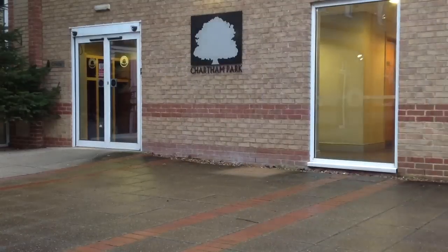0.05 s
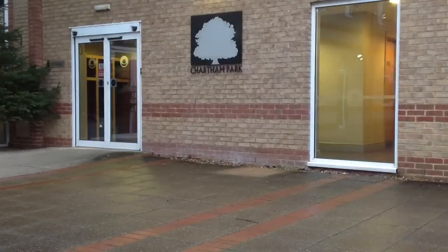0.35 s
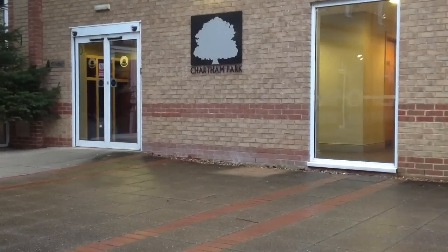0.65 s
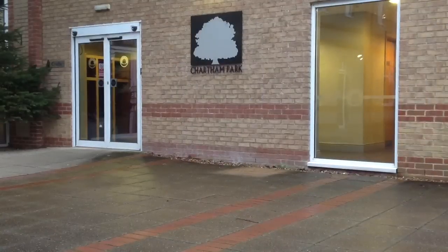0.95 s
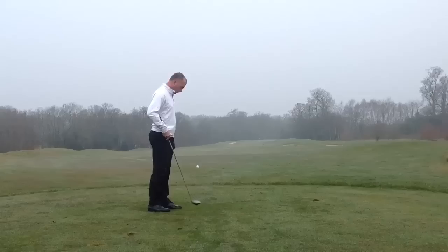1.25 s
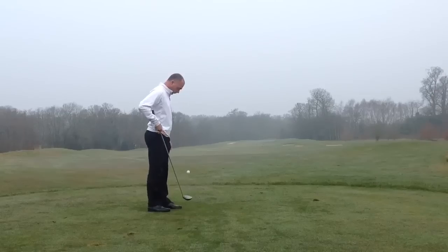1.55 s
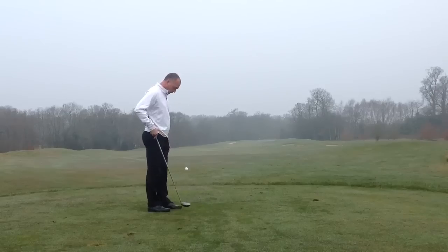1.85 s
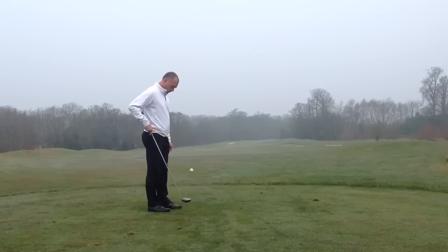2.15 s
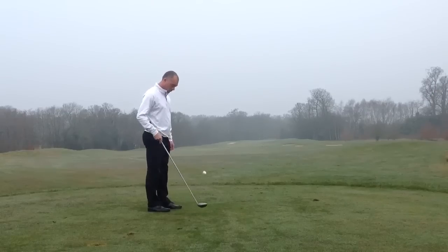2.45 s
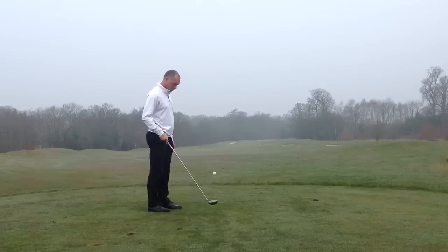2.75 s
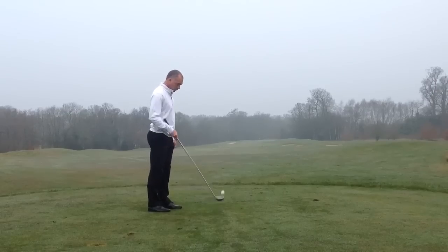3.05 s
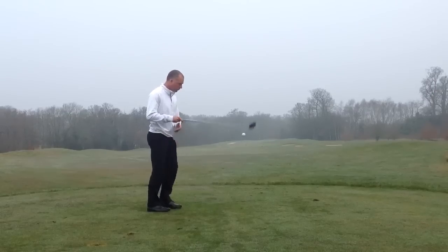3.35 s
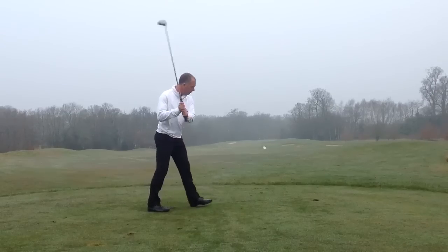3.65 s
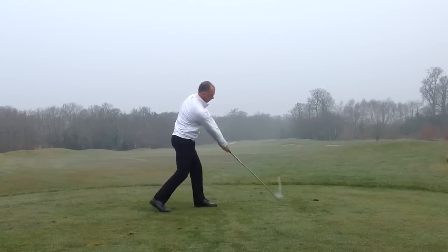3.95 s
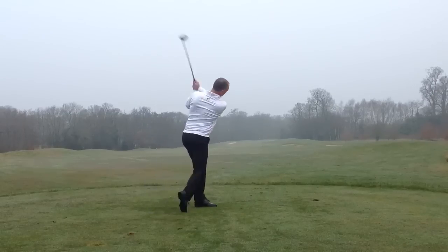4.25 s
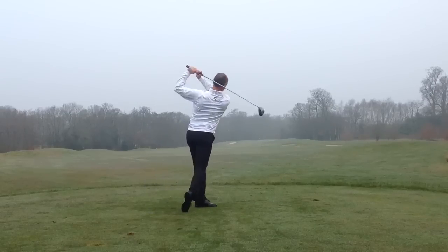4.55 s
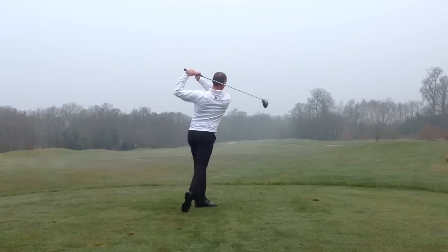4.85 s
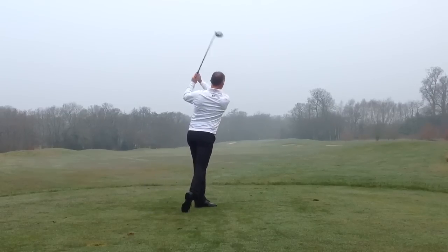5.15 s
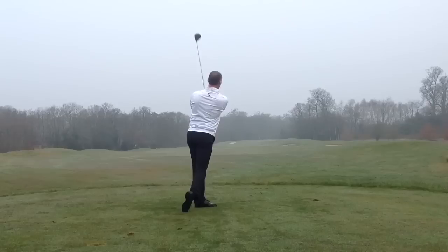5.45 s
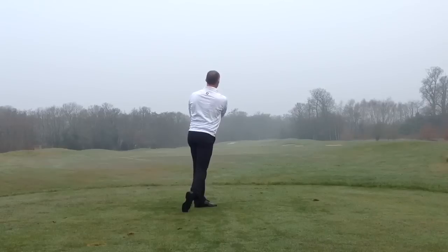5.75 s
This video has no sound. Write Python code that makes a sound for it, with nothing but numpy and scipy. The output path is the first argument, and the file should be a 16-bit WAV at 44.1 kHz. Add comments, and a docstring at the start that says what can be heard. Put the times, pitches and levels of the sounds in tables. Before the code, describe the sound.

Four evenly spaced clicks of a golf ball on a club, then a swish and a loud metallic crack on a quiet course.

```python
"""Golf ball juggled and driven

A building's forecourt hums, then the scene cuts to an open golf course with far birds.
A golfer bounces a ball four times on his driver's face, steps in and hits it out of the air.
The hollow metal head rings; as it flies away the Doppler effect flattens the ring, which
glides back up as the head slows. The turf and a line of trees answer faintly."""
import sys
import numpy as np
from scipy import signal
from scipy.fft import rfft, irfft, next_fast_len
from scipy.io import wavfile
from scipy.ndimage import map_coordinates

SR = 44100
rng = np.random.default_rng(int(sys.argv[2]) if len(sys.argv) > 2 else 0)


def dump_mix(stems):
    """Bounce the given channels to the path in sys.argv[1] as a 16-bit WAV at rate SR."""
    frames = np.atleast_2d(stems).T  # one column per channel
    limited = np.clip(frames, -1, 1)  # hard clip at full scale
    pcm = np.round(limited * 32767).astype(np.int16)
    wavfile.write(sys.argv[1], SR, pcm)


N = 255339
TOP_HZ, SOUND_SPEED_M_S = 15350, 343


def amp(db):
    """Decibels to gain."""
    return 10 ** (np.asarray(db) / 20)


def unit(x):
    """Scale to rms 1."""
    return x / np.sqrt(np.mean(x ** 2) + 1e-20)


def along(points, hz):
    """Read (freq_hz, value) rows on a log axis."""
    freq_hz, values = np.transpose(points)
    return np.interp(np.log(hz + 1), np.log(freq_hz + 1), values)


def curve(rows):
    """One value per sample from (time_s, value) rows."""
    return np.interp(np.arange(N) / SR, *np.transpose(rows))


def wobble(rate_hz):
    """Smooth random curve."""
    knots = rng.standard_normal(int(N * rate_hz / SR) + 4)
    return map_coordinates(knots, [np.arange(N) * rate_hz / SR])


def filtered(x, response):
    """Apply a gain that depends on frequency."""
    size = next_fast_len(len(x) + SR // 4)
    return irfft(rfft(x, size) * response(np.fft.rfftfreq(size, 1 / SR)), size)[:len(x)]


def butter(x, edge_hz, kind):
    """Butterworth filter, 12 dB per octave."""
    return signal.lfilter(*signal.butter(2, edge_hz, kind, fs=SR), x)


def noise(spectrum):
    """Shaped noise of rms 1."""
    return unit(filtered(rng.standard_normal(N), lambda hz: amp(along(spectrum, hz))))


def add(track, start_s, sound):
    """Mix a sound into the track."""
    part = track[round(start_s * SR):][:len(sound)]
    part += sound[:len(part)]


# freq_hz, density_db
FORECOURT_SPECTRUM = [(25, -44), (50, -34), (90, -16.5), (180, -5.5), (320, -0.5), (450, -6), (640, -6),
                      (950, -10), (1380, -6.5), (1900, -16), (2850, -26), (4700, -30), (7000, -34.5),
                      (15000, -39)]
COURSE_SPECTRUM = [(25, -42.5), (45, -36.5), (75, -13), (130, -0.5), (190, -0.5), (330, -4), (470, -12.5),
                   (750, -11), (980, -8.5), (1500, -16), (2300, -22), (3200, -26), (6000, -30.5),
                   (15000, -35.5)]
RUMBLE_SPECTRUM = [(90, -51), (190, -16), (280, 3), (390, 2.5), (520, -13), (900, -35), (2000, -69)]
# time_s, level_db
RUMBLE_LEVEL = [(1.27, -70.5), (1.58, -56.5), (1.78, -69), (2.28, -56), (2.46, -58.5), (2.7, -53),
                (3.2, -64.5), (3.7, -64), (3.85, -59.5), (4.2, -64.0), (4.98, -64.5), (5.08, -58.5),
                (5.45, -57.5), (5.6, -63.5), (5.75, -54.0)]


def air(cut_s=1.265, fade_s=0.0075):
    """Steady forecourt hum, then the quieter course with swells of low rumble."""
    forecourt = amp(-52 + 0.66 * wobble(7.55)) * noise(FORECOURT_SPECTRUM)
    course = amp(-57 + 0.45 * wobble(4.6)) * noise(COURSE_SPECTRUM)
    rumble = amp(curve(RUMBLE_LEVEL) + 1.6 * wobble(20)) * noise(RUMBLE_SPECTRUM)
    on_course = np.clip((np.arange(N) / SR - cut_s) / fade_s + 0.5, 0, 1)
    return (1 - on_course) * forecourt + on_course * (course + rumble)


# start_s, level_db
TICKS = [(.0802, -42.5), (.549, -43)]


def ticks(band_hz=(1000, 3500), t60_s=0.013):
    """Faint dry ticks on the forecourt."""
    out, t = np.zeros(N), np.arange(SR // 20) / SR
    for start_s, level_db in TICKS:
        add(out, start_s, amp(level_db - 60 * t / t60_s) * rng.standard_normal(len(t)))
    return butter(out, band_hz, 'band')


# freq_hz, t60_s
TURF_DECAY = [(300, 0.31), (2000, .3), (6000, .3), (9000, 0.23), (14000, 0.11)]
TREE_DECAY = [(300, 0.78), (2000, 0.74), (4200, .6), (5200, 1.1), (6000, 0.59), (7500, 0.5), (14000, .1)]


def scatter(x, decay, delay_s, rise_s):
    """Diffuse outdoor echo: builds after a delay, each frequency dying at its own rate."""
    hz, t, bins = signal.stft(rng.standard_normal(SR), SR, nperseg=256)
    tail = signal.istft(bins * amp(-60 * t / along(decay, hz)[:, None]), SR, nperseg=256)[1]
    tail *= np.clip((np.arange(len(tail)) / SR - delay_s) / rise_s, 0, 1)
    return signal.fftconvolve(x, tail / np.linalg.norm(tail))[:N]


def bird_note(length_s, bend_hz):
    """Pure tone bending through three pitches."""
    progress = np.linspace(0, 1, int(length_s * SR))
    pitch_hz = np.polyval(np.polyfit([0, 0.5, 1], bend_hz, 2), progress)
    envelope = np.sqrt(np.abs(np.sin(np.pi * progress)))
    return envelope * np.sin(2 * np.pi * np.cumsum(pitch_hz) / SR)


# time_s, level_db
FLOCK_LEVEL = [(0, -81), (1.7, -80), (2.3, -74.5), (4.3, -76.5), (5.25, -85)]


def flock(centre_hz=3350, pitch_spread=0.21, bend_spread=0.1, flutter_db=3, count=450):
    """Far birds overlap in short twitters, each with its own pitch and bend."""
    out = np.zeros(N)
    for when, length, *draws in rng.random((count, 6)):
        pitch, *bend = 2 * np.array(draws) - 1
        bend_hz = centre_hz * np.exp(pitch_spread * pitch + bend_spread * np.array(bend))
        add(out, when * N / SR, bird_note(0.022 + 0.04 * length, bend_hz))
    return amp(curve(FLOCK_LEVEL)) * unit(out * amp(flutter_db * wobble(120)))


def trill(start_s=5.37, attack_s=0.16, centre_hz=3350, level_db=-71.5, waver=0.038, flutter_db=3):
    """One bird holds a note that wavers fast in pitch and strength."""
    pitch_hz = centre_hz * np.exp(waver * wobble(130))
    note = np.sin(2 * np.pi * np.cumsum(pitch_hz) / SR) * amp(flutter_db * wobble(60))
    swell = np.clip((np.arange(N) / SR - start_s) / attack_s, 0, 1)
    return amp(level_db) * swell * unit(note)


# length_s, start_pitch_ratio, end_pitch_ratio
UPSLUR_SHAPE = (0.057, .74, 1.12)
ARCH_SHAPE = (.072, .88, 1.0)
DOWNSLUR_SHAPE = (0.066, 1.13, 0.94)
WHISTLE_SHAPE = (0.122, 0.99, 0.96)
CHIRP_SHAPE = (0.056, 1.2, .94)
CHIP_SHAPE = (.028, 1.24, 0.78)
# start_s, mid_pitch_hz, relative_db
UPSLURS = [(1.22, 4190, -68), (1.462, 4500, -67), (1.855, 4780, -64)]
ARCHES = [(.82, 4550, -67), (1.06, 4950, -67.5), (1.772, 5000, -64.5), (1.94, 5100, -71),
          (2.835, 3710, -66)]
DOWNSLURS = [(1.278, 4670, -64), (1.66, 4780, -61.5), (1.755, 6050, -72), (2.045, 4940, -65.5),
             (2.806, 2920, -65.5)]
WHISTLES = [(1.514, 2780, -66), (1.77, 2830, -65), (1.79, 3450, -72), (2.221, 2670, -67),
            (2.472, 2770, -61.5), (2.915, 2714, -65.5), (3.18, 2760, -62.5), (4.108, 4330, -69)]
CHIRPS = [(2.065, 3150, -63), (2.135, 3000, -65), (2.715, 3250, -69), (3.638, 2950, -65),
          (3.773, 3000, -63), (4.056, 2940, -61), (4.192, 2975, -62)]
CHIPS = [(4.478, 3700, -70), (4.549, 3900, -62.5), (4.635, 3950, -62.5)]


def birds(gain_db=-1.8, flutter_db=3):
    """A few birds repeat six kinds of note, higher or lower."""
    song = np.zeros(N)
    kinds = [(UPSLUR_SHAPE, UPSLURS), (ARCH_SHAPE, ARCHES), (DOWNSLUR_SHAPE, DOWNSLURS),
             (WHISTLE_SHAPE, WHISTLES), (CHIRP_SHAPE, CHIRPS), (CHIP_SHAPE, CHIPS)]
    for (length_s, start_ratio, end_ratio), notes in kinds:
        for start_s, mid_hz, relative_db in notes:
            note = bird_note(length_s, [start_ratio * mid_hz, mid_hz, end_ratio * mid_hz])
            add(song, start_s, amp(relative_db + gain_db) * note)
    return song * amp(flutter_db * wobble(70))


# start_s, level_db
STEPS = [(3.529, -43), (3.869, -44)]


def footsteps(thud_hz=310, rise_s=0.0039):
    """Two soft footfalls on turf."""
    out, t = np.zeros(N), np.arange(SR // 8) / SR
    envelope = 2 * (t / rise_s) ** 2 * np.exp(-t / rise_s)
    for start_s, level_db in STEPS:
        add(out, start_s, amp(level_db) * envelope * np.sin(2 * np.pi * thud_hz * t))
    return out


# freq_hz, density_db
SWISH_SPECTRUM = [(60, -57.5), (200, -24), (450, -3.5), (700, 0), (1400, -5.5), (3000, -20), (5000, -32),
                  (10000, -50.5)]


def swish(peak_s=3.922, peak_db=-48.5, rise_db_per_s=362, fall_db_per_s=140):
    """Air torn by the club, loudest where the head is fastest, just before the blow."""
    after_s = np.arange(N) / SR - peak_s
    level_db = peak_db + np.minimum(rise_db_per_s * after_s, -fall_db_per_s * after_s)
    return amp(level_db) * noise(SWISH_SPECTRUM)


# freq_hz, bounce_db, full_blow_db, base_t60_s
KNOCK_MODES = [(450, -18, -16, 0.012), (666, -15, -14, .015), (850, -14.5, -9.5, 0.013),
               (1125, -10.5, -17.5, 0.013), (1375, -5.5, -11, 0.012), (1540, -14.5, -32, .008),
               (1717, -5.5, -12, 0.014), (1884, -27, -5.5, 0.012), (2560, -19, -11.5, 0.0095),
               (3030, -13, -12, .003)]


def knock(t, force, contact_hz, linger_hz, crack_db, crack_t60_s, crack_low_hz):
    """Pock and brief crack of ball on face: force (0-1) brightens it, modes near linger_hz last longer."""
    body = np.zeros(len(t))
    for hz, bounce_db, full_blow_db, base_t60_s in KNOCK_MODES:
        level_db = bounce_db + force * (full_blow_db - bounce_db)
        t60_s = base_t60_s * (1 + 0.96 * np.exp(-(np.log(hz / linger_hz) / 0.088) ** 2))
        body += amp(level_db - 60 * t / t60_s) * np.cos(2 * np.pi * hz * t)
    body = butter(body, contact_hz, 'low')
    body = butter(body, 350, 'high')  # a small body radiates little bass
    body -= 2 * signal.lfilter(*signal.iirpeak(1400, Q=3.3, fs=SR), body)  # all-pass: mids swell late
    crack_band_hz = [crack_low_hz, np.clip(4.1 * contact_hz, 5000, TOP_HZ)]
    crack = butter(rng.standard_normal(len(t)), crack_band_hz, 'band')
    return body + amp(crack_db - 60 * t / crack_t60_s) * crack


# freq_hz, centre_hit_db, edge_hit_db, t60_s
HEAD_MODES = [(4356, -28, -4, .15), (5480, -3, -9.5, 0.15), (6095, 0, -13, 0.096), (6775, -9.5, -17, 0.13),
              (7020, -12, -20, .1), (7520, -8.5, -8, 0.073), (7940, -11, 3.5, 0.083), (8100, -21, -9, .07),
              (9200, -17.5, -9, .08), (9607, 0.5, -0.5, 0.078), (10400, -15, -26, .05),
              (10800, -28, -21, .06), (12290, -18, -34, .04), (13870, -25.5, -32, .06),
              (14780, -17.5, -24, .07), (15500, -17, -28, .07)]


def head_ring(age_s, off_centre, contact_hz):
    """Modes of the hollow head: the spot struck sets their mix, a soft contact spares the highest."""
    hz, centre_db, edge_db, t60_s = np.transpose(HEAD_MODES)[:, :, None]
    rolloff = np.sqrt(1 + (hz / (6.5 * contact_hz)) ** 12)
    strength = amp(centre_db + off_centre * (edge_db - centre_db)) / rolloff
    modes = strength * amp(-60 * age_s / t60_s) * np.sin(2 * np.pi * hz * age_s)
    return butter(modes.sum(axis=0), 2000, 'high')  # the ring keeps only its treble


# start_s, knock_db, ring_db, off_centre_ratio, contact_hz, linger_hz, ground_lag_ms
BOUNCES = [(1.4186, -22.5, -38, 0.2, 1740, 1385, 1.38), (1.9982, -21.5, -36.5, 0.6, 1560, 1240, 1.35),
           (2.5664, -23, -42.5, 0.56, 1500, 1520, 4.25), (3.0417, -20, -42, 0.88, 1610, 655, 1.6)]


def bounces(ground_db=-11, golfer_db=-16, golfer_lag_ms=3.1, shimmer_db=-43):
    """Ball bouncing on the face: the knock reflects off ground and golfer, the ring off the turf."""
    out, to_turf, t = np.zeros(N), np.zeros(N), np.arange(SR // 2) / SR
    for start_s, knock_db, ring_db, off_centre, contact_hz, linger_hz, ground_lag_ms in BOUNCES:
        pock = knock(t, 0, contact_hz, linger_hz, crack_db=-9, crack_t60_s=0.019, crack_low_hz=3230)
        pock *= amp(knock_db)
        ring = head_ring(t, off_centre, contact_hz)
        add(out, start_s, pock + amp(ring_db) * ring)
        add(out, start_s + ground_lag_ms / 1000, amp(ground_db) * pock)
        add(out, start_s + golfer_lag_ms / 1000, amp(golfer_db) * pock)
        add(to_turf, start_s, amp(knock_db) * ring)
    return out + amp(shimmer_db) * scatter(to_turf, TURF_DECAY, delay_s=0.024, rise_s=0.052)


# start_s, knock_db, ring_db, off_centre_ratio, contact_hz, linger_hz, ground_lag_ms
FULL_BLOW = (3.9446, -4.5, -18, 0, 3130.5, 610.5, 1.64)
# after_blow_s, direct_m_s, ground_image_m_s
RECEDING_SPEED = [(0, 25.5, 22.5), (.017, 26, 35.5), (0.056, 10, 22), (.1, -0.5, 8), (.3, 3, 5)]


def drive(ground_knock_db=-9, ground_ring_db=-14, fade_db_per_s=160, shimmer_db=-29):
    """Full blow: the ring arrives directly and off the ground, each path with its own Doppler glide."""
    out, to_turf, t = np.zeros(N), np.zeros(N), np.arange(SR // 2) / SR
    start_s, knock_db, ring_db, off_centre, contact_hz, linger_hz, ground_lag_ms = FULL_BLOW
    after_blow_s, *speeds = np.transpose(RECEDING_SPEED)
    direct_m_s, image_m_s = [np.interp(t, after_blow_s, speed) for speed in speeds]

    def receding_ring(speed_m_s):
        """The ring, flattened as the head moves away."""
        age_s = np.cumsum(SOUND_SPEED_M_S / (SOUND_SPEED_M_S + speed_m_s)) / SR
        return amp(ring_db) * head_ring(age_s, off_centre, contact_hz)

    pock = knock(t, 1, contact_hz, linger_hz, crack_db=-18.5, crack_t60_s=0.022, crack_low_hz=2400)
    pock *= amp(knock_db)
    turning_away = amp(-fade_db_per_s * t)
    add(out, start_s, pock + turning_away * receding_ring(direct_m_s))
    reflection = amp(ground_knock_db) * pock + amp(ground_ring_db) * receding_ring(image_m_s)
    add(out, start_s + ground_lag_ms / 1000, reflection)
    # turf at each bearing returns a different Doppler shift
    shifted = [receding_ring(share * direct_m_s) for share in np.linspace(-0.4, 1, 6)]
    add(to_turf, start_s, sum(shifted) / np.sqrt(len(shifted)))
    return out + amp(shimmer_db) * scatter(to_turf, TURF_DECAY, delay_s=0.005, rise_s=0.14)


def scene():
    """Club and ball close by, birds far off, with outdoor echoes over the background air."""
    club = bounces() + drive()
    song = birds() + flock() + trill()
    turf_echo = amp(-31) * scatter(club, TURF_DECAY, delay_s=0.005, rise_s=0.04)
    tree_echo = amp(-43.5) * scatter(club, TREE_DECAY, delay_s=0.113, rise_s=0.12)
    song_echo = amp(-10) * scatter(song, TURF_DECAY, delay_s=0.011, rise_s=0.02)
    golfer = club + turf_echo + tree_echo + swish() + footsteps()
    return (golfer + song + song_echo + air() + ticks())[None]


def record(dry):
    """Soft-clip the loudest peak and cut everything above TOP_HZ."""
    rounded = dry / (1 + dry ** 4) ** (1 / 4)
    return np.array([filtered(channel, lambda hz: hz < TOP_HZ) for channel in rounded])


dry = scene()
out = record(dry)
dump_mix(out)
```